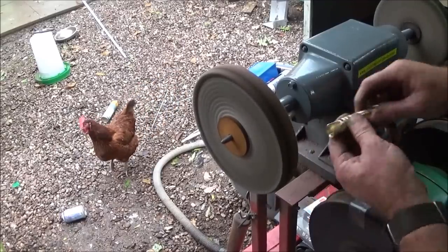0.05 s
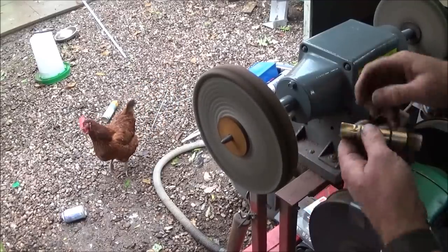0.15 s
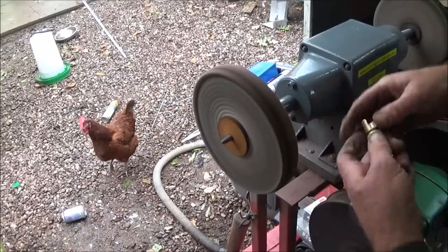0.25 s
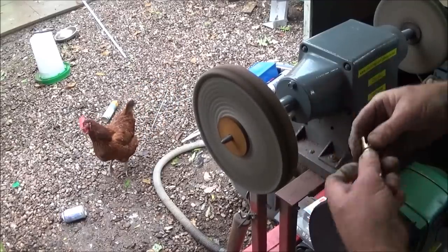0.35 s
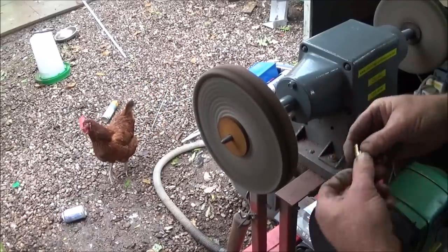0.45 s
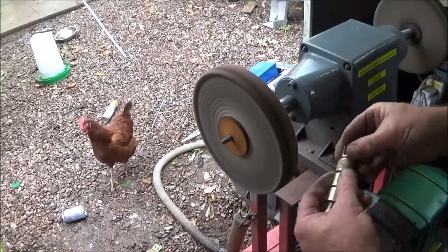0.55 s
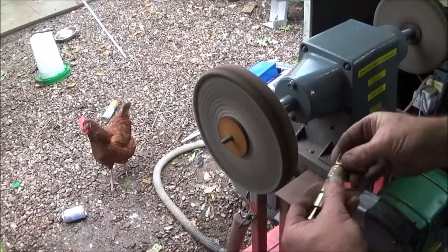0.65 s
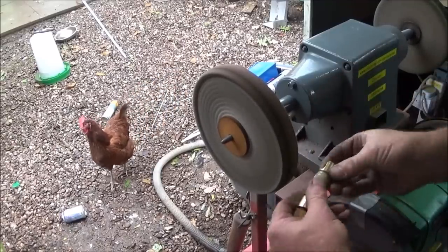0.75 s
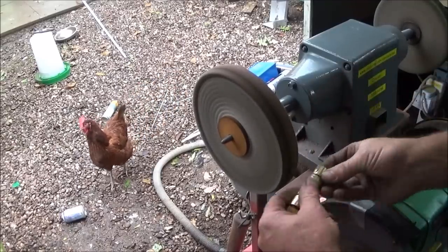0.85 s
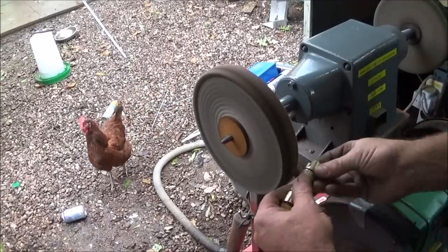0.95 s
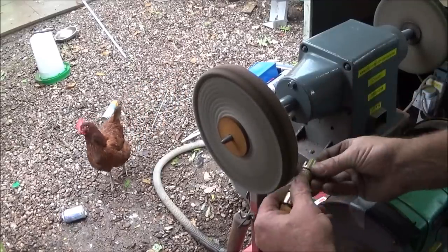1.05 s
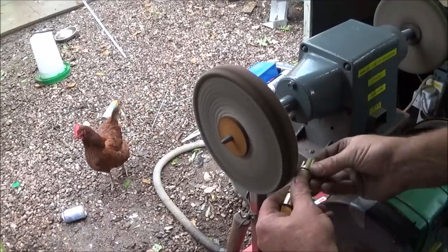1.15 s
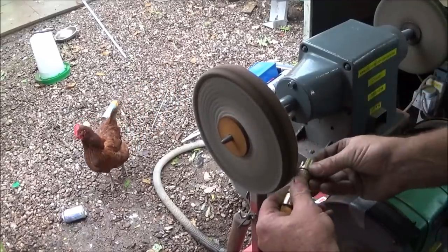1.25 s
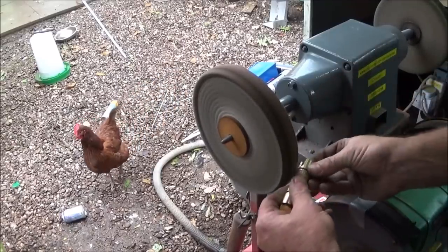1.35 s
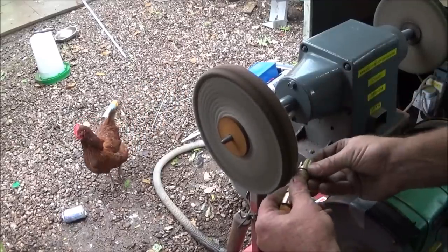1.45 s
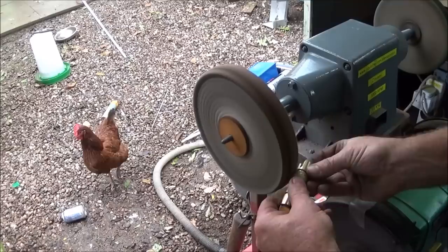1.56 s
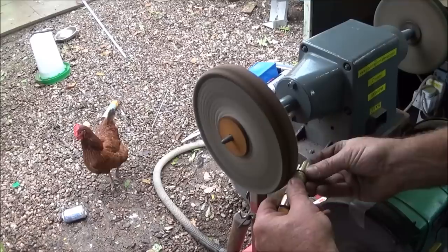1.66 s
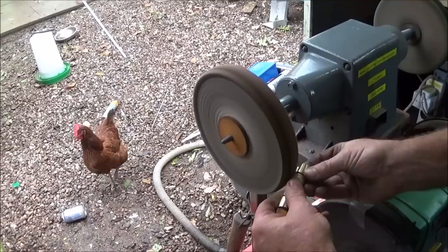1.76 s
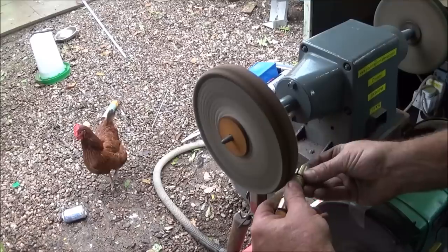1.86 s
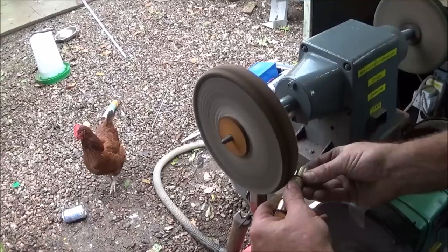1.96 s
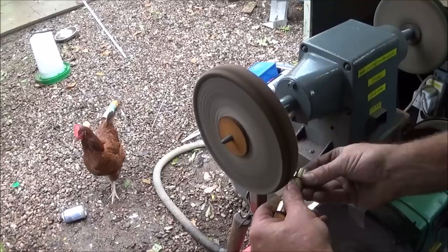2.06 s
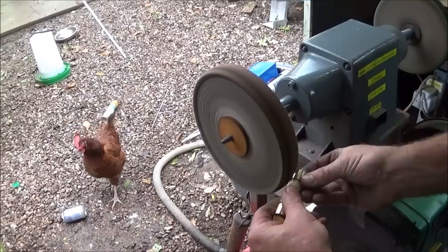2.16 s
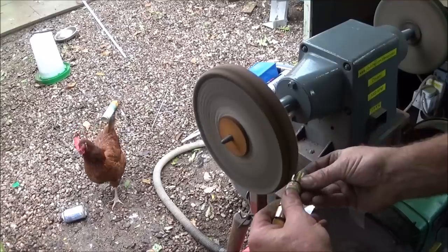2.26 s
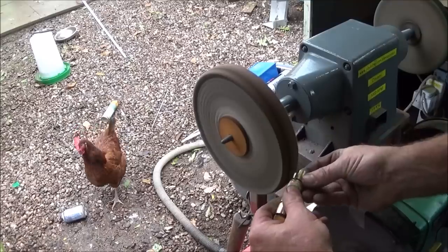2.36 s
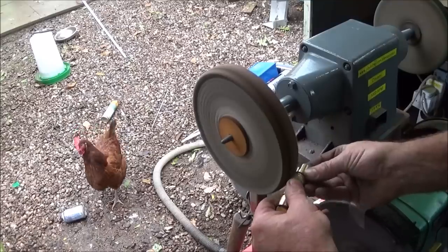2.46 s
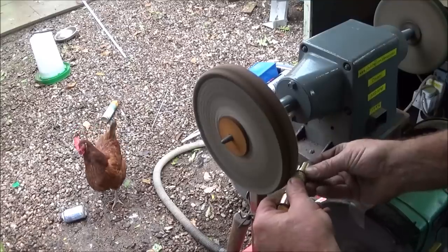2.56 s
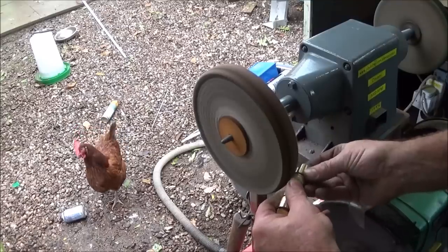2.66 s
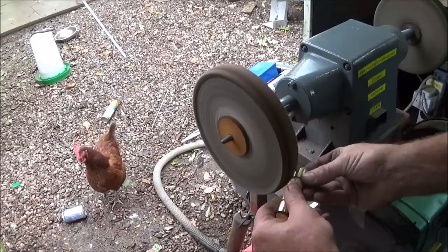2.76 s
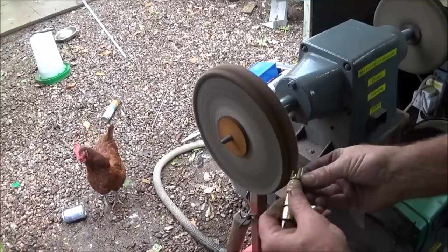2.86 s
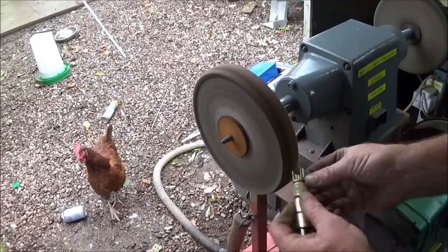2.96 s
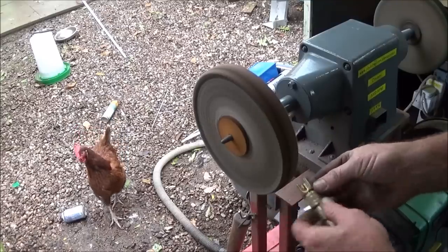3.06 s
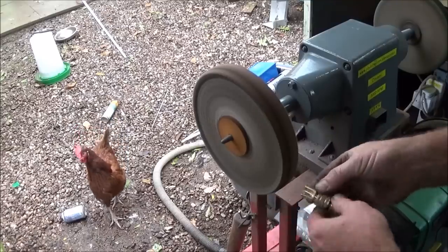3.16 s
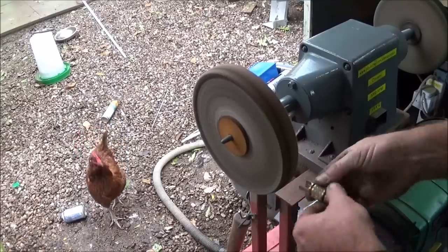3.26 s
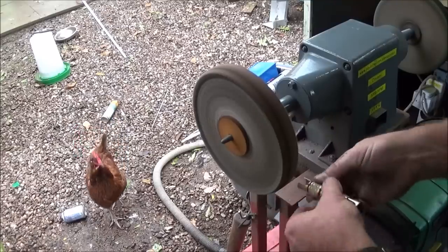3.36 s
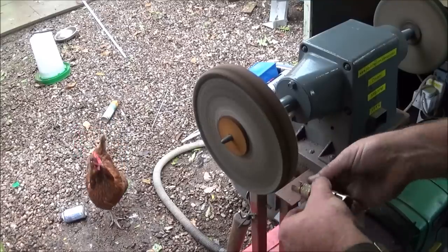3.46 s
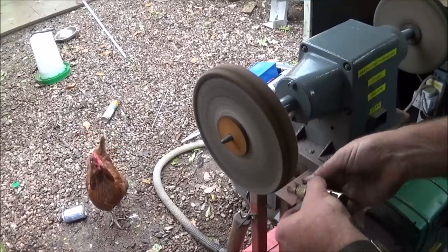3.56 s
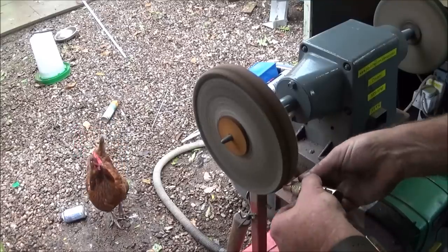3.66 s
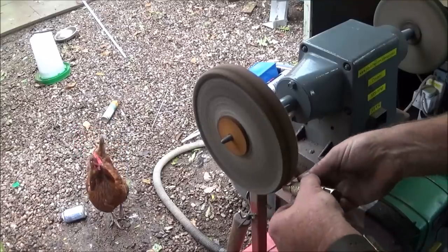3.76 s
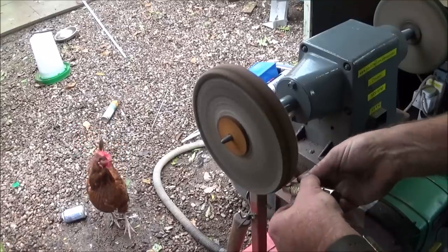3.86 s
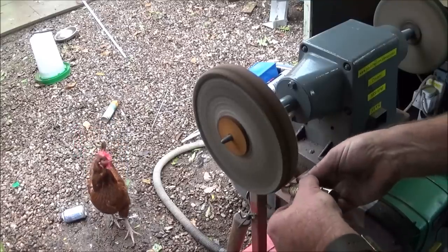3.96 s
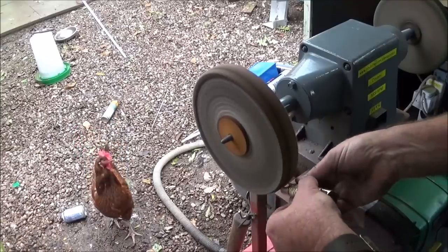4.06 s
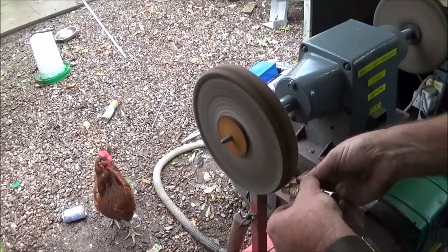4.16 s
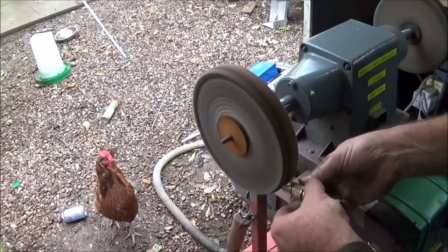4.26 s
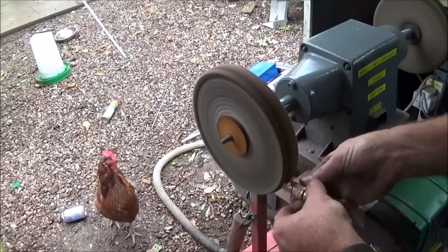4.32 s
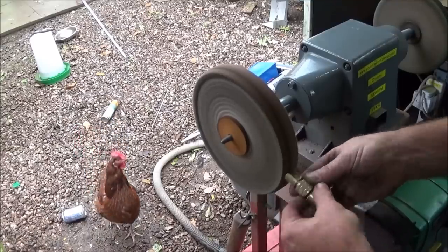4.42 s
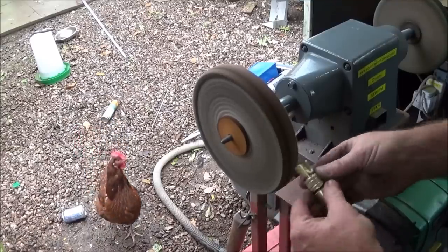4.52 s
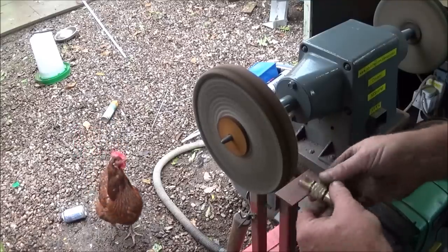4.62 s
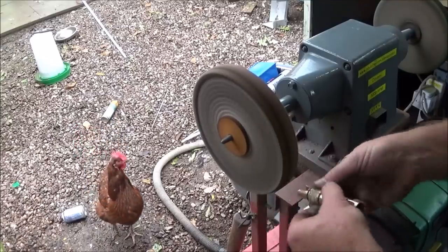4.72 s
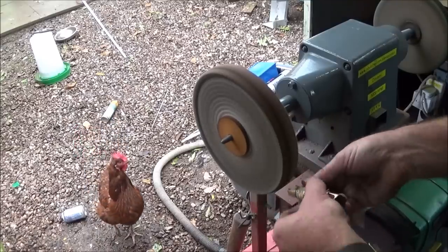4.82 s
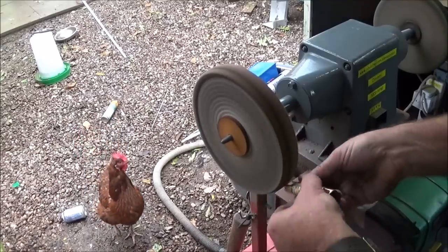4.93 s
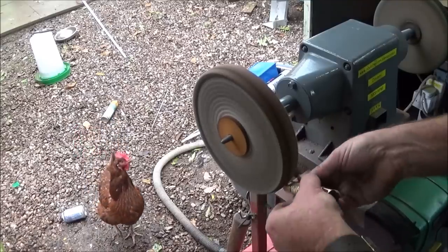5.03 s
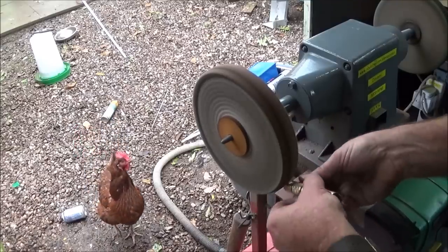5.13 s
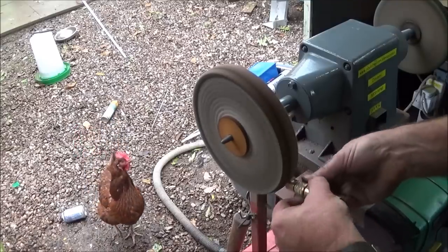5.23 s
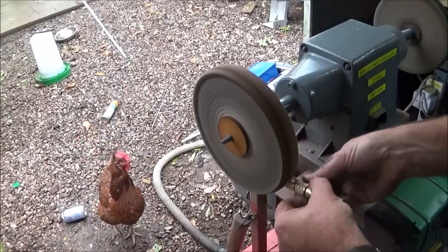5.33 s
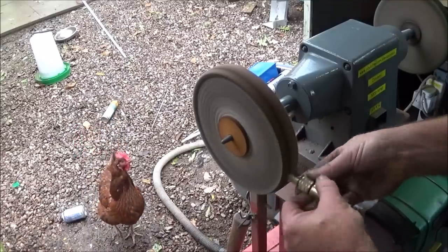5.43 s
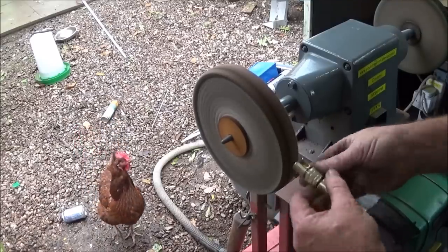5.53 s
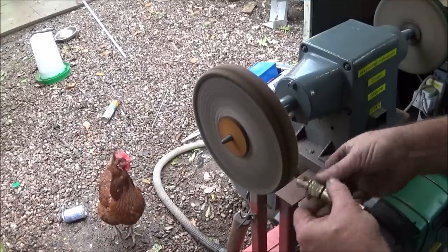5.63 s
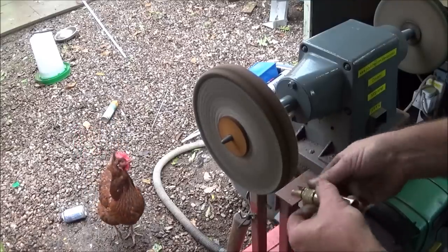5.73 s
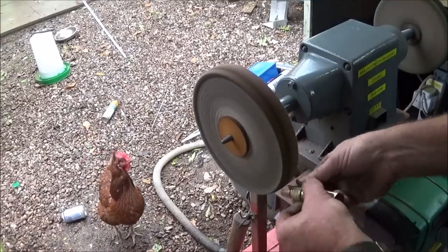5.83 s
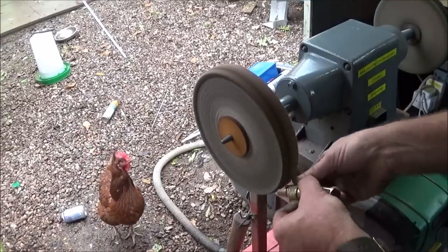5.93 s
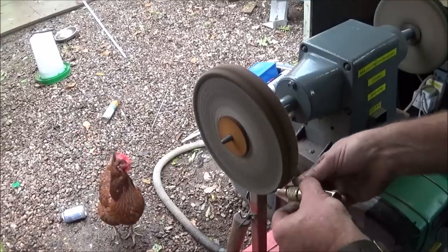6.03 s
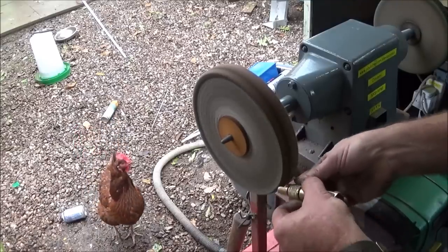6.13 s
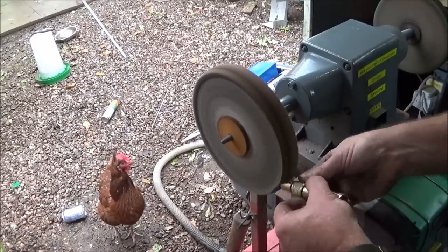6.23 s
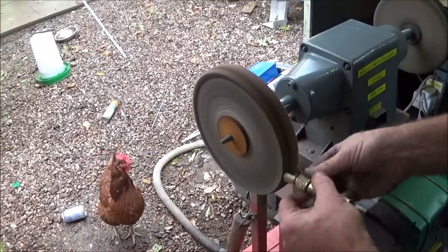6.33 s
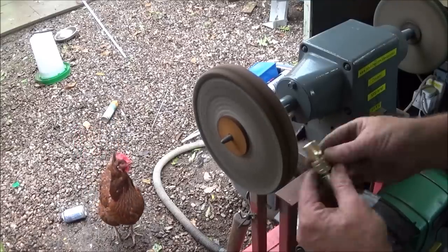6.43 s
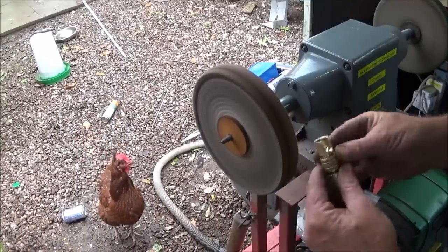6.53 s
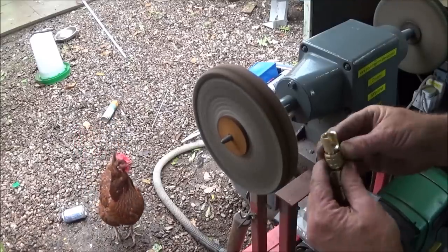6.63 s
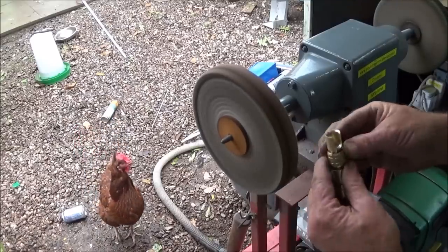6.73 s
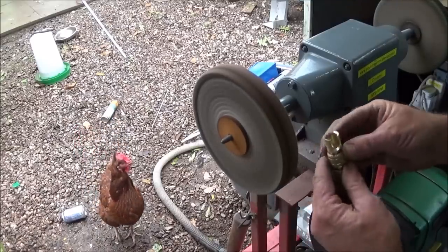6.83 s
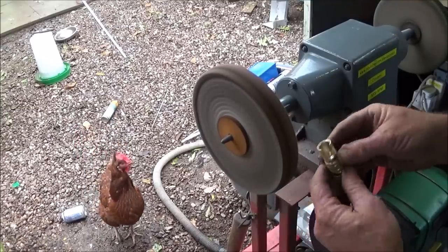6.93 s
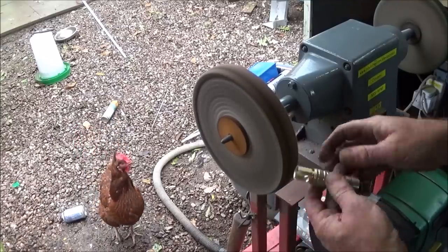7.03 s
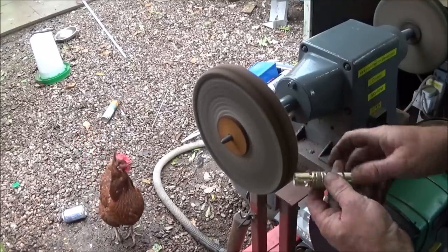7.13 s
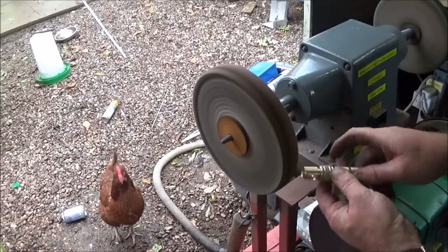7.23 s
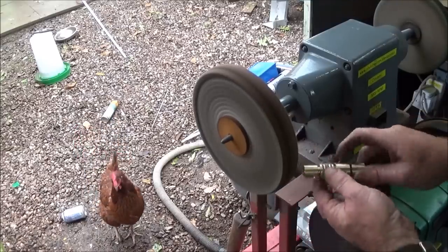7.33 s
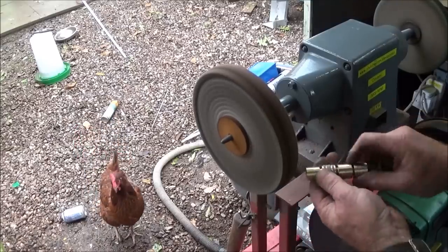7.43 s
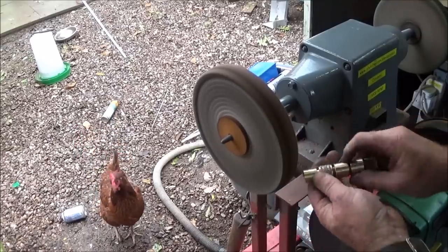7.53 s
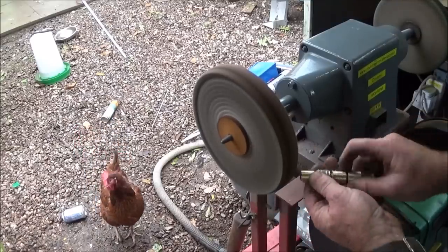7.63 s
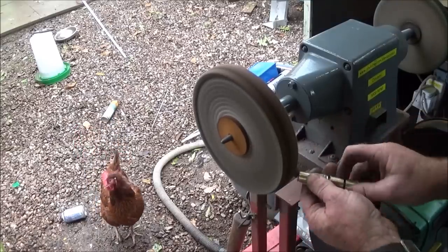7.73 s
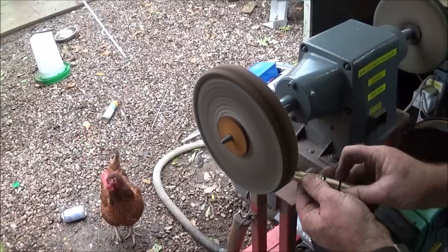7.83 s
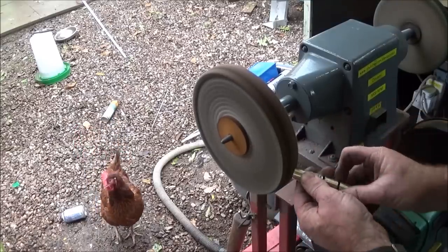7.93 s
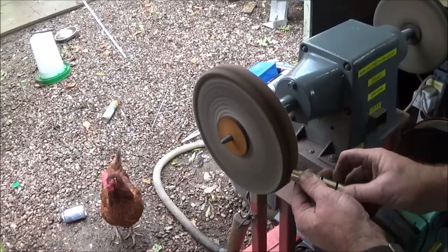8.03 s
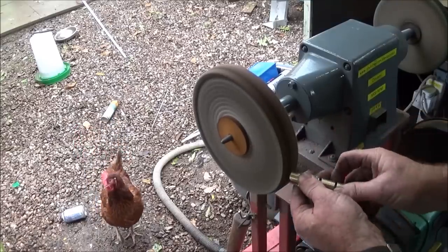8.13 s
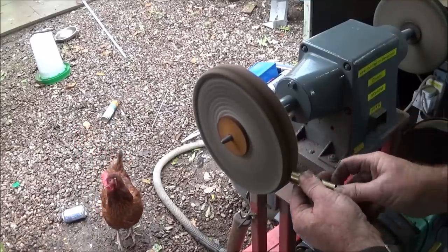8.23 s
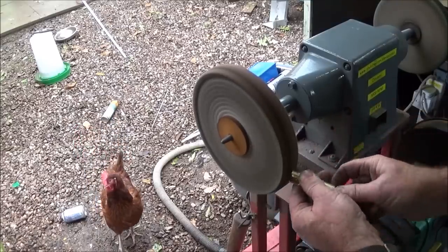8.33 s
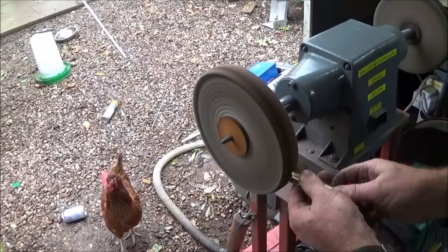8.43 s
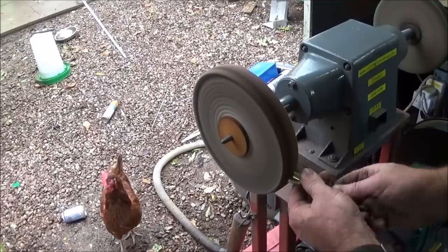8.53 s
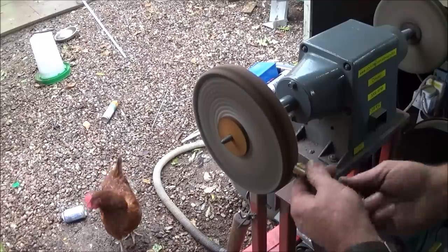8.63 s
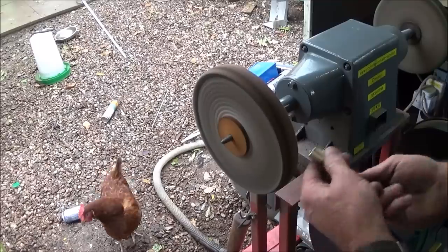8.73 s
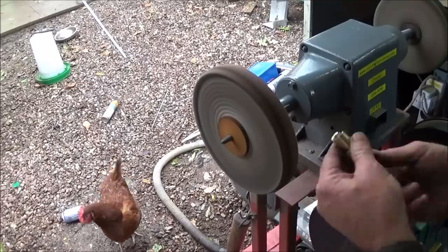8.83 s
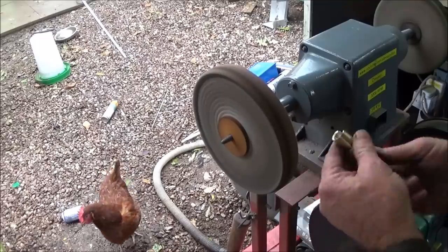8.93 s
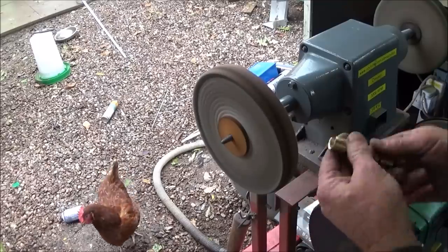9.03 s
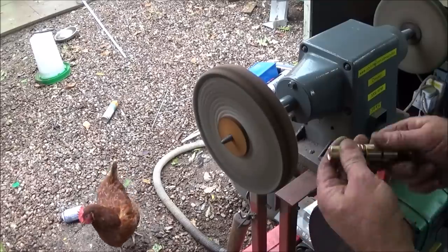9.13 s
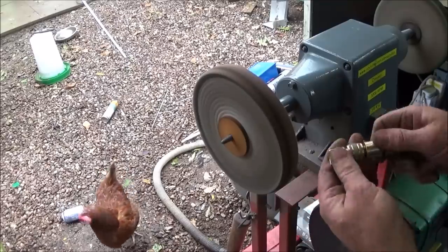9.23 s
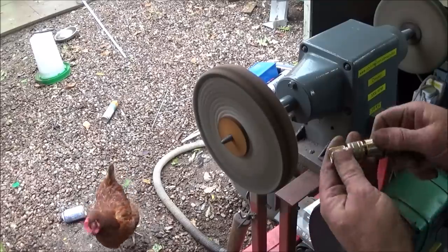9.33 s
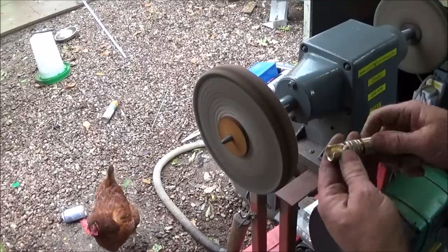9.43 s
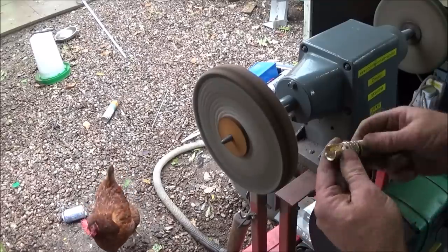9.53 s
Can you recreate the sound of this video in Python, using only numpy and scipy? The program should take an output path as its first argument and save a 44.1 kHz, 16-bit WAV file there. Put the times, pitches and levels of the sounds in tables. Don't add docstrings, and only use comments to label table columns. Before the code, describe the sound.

Steady whirring motor and rushing air in an open outdoor shed, heard close up in stereo. Brass rubs against spinning cloth in six separate strokes: two early, three firmer ones in the middle, then, after a pause, one slow last approach. Each scrape is sizzling and high, with shifting metallic tones. The background sinks during rubs and swells back afterwards. A very short, rising hen croon closes.

```python
import sys
import numpy as np
from scipy import signal
from scipy.fft import rfft, irfft, next_fast_len
from scipy.io import wavfile
from scipy.ndimage import uniform_filter1d

SR = 44100
rng = np.random.default_rng(int(sys.argv[2]) if len(sys.argv) > 2 else 0)


def gain_from_db(level_db):
    decades = np.asarray(level_db, float) / 20
    return 10 ** decades


def wav_record(signal):
    frames = np.transpose(np.atleast_2d(signal))
    bounded = np.clip(frames, -1, 1)
    quanta = np.round(bounded * 32767).astype(np.int16)
    wavfile.write(sys.argv[1], SR, quanta)


N = 422478
TIME = np.arange(N) / SR

FREE_HZ = 49.85
AIR_DB, HUM_DB, BUZZ_DB, SHAKE_DB = -31.5, -29, -35, -47.5
HUM_DB_PER_HZ, BUZZ_DB_PER_HZ, SHAKE_DB_PER_HZ = 13, 8, 7
# shaft_order, level_db
HUM_ORDERS = [(3, -8.5), (4, -26)]
# shaft_order, level_db
BUZZ_ORDERS = [(5, 6), (6, 8), (7, 10.5), (8, 7)]
# shaft_order, level_db
ROTOR_ORDERS = [(9, -4), (10, -1), (11, -3), (12, 5), (13, -3), (15, -6), (16, -38), (17, -1.5), (18, -5),
                (19, -4.5), (21, 5), (22, -15.5), (23, -21), (25, -28), (28, -18)]
# shaft_order, level_db
SHAKE_ORDERS = [(1, 0), (2, 0)]
# pitch_hz, level_db
BEARING_LINES = [(2506.0, -11), (3880.0, -7), (4126.0, -5), (4164.0, -9), (4226.0, -14), (4310.0, -11),
                 (4372.0, -7), (4617.0, -7), (4656.0, -12), (4863.0, -2), (4894.0, -12), (4901.0, -5),
                 (4955.0, -14), (4963.0, -12), (4998.0, -14), (5097.0, -9), (5139.0, -14), (5147.0, -13),
                 (5159.0, -8), (5197.0, -8), (5354.0, -11), (5404.0, -13), (5588.0, -11), (5794.0, -14),
                 (5955.0, -13), (5974.0, -12), (5993.0, -13), (6080.0, -11)]
# frequency_hz, density_db (per Hz)
AIR_SPECTRUM = [(30, -40), (95, -27), (200, -24), (380, -14.5), (775, -18.5), (1030, -15.5), (1240, -17.5),
                (3190, -18.5), (4990, -16.5), (6650, -19.5), (10700, -22), (14600, -42.5), (16500, -31.5)]
# time_s, hum_db, buzz_db
SHADE = [(0, 0, 3), (.55, -1, 2), (1, -4, 0), (1.25, -4.5, -5), (1.6, -1.5, 2), (2.1, 0.5, -1),
         (2.35, -1.5, 5.5), (2.9, -4, -3.5), (3.3, -1, 2), (3.7, -1, 1.5), (4.6, -1, 1), (6.2, 0.5, 1),
         (7, -1, 0.5), (7.7, -0.5, 3.5), (8.3, -2.5, -2.5), (8.8, 0.5, 1.5), (9.2, 0, 2), (9.58, -1, 4.5)]

SLIP_LAG_S, STAND_LAG_S, EASE_S = 0.0867, 0.036, 0.04596
TOUCH_S, LIFT_S, CLEAR_DB = 0.042, 0.046, -36.5
# time_s, hiss_db, ring_db (main ring over the hiss)
STROKES = [
    [(1.3, -39, -14), (1.6, -26, -9), (1.65, -21.5, -14), (1.85, -14, -3), (1.92, -16.5, 0.5),
     (2.05, -14.5, 3.5), (2.2, -15.5, 5), (2.26, -23, -2)],
    [(2.425, -19, 5.5), (2.49, -14.5, -8), (2.63, -21.5, -24), (2.7, -15, 0), (2.77, -11.5, 6),
     (2.855, -12.5, 3)],
    [(3.72, -25, 13), (3.81, -20, 7), (3.934, -22.5, 9.5), (4.17, -20, 4), (4.35, -18, 14), (4.43, -11, -5),
     (4.475, -13, -15)],
    [(4.986, -20.5, 2), (5.08, -20.5, 1.5), (5.22, -19, 9), (5.36, -19.5, 9), (5.46, -14, 1),
     (5.496, -18, -5)],
    [(5.912, -21, 2), (6.12, -17, -6.5), (6.256, -15, 5), (6.35, -9.5, -2.5), (6.384, -17, -5)],
    [(7.85, -37, -11), (8.012, -35, -18), (8.05, -22, -15), (8.15, -17, -10), (8.46, -12, -20),
     (8.57, -14, -4), (8.63, -17.5, -13)],
]
# end_slip_hz, rise_exponent
LEANS = [
    (.27, 1.8),
    (0.301, 2.205),
    (.85, 2.6),
    (1.05, 1.3),
    (1.05, 1.3),
    (0.248, 0.304),
]

SHIFT_S = .06
UPPER_FOLLOW = 0.55
# frequency_hz, density_db (per Hz)
CLOTH_SPECTRUM = [(2500, -27.5), (3500, -8.5), (4760, -1.5), (6000, -3), (7800, -7.5), (9600, -4.5),
                  (12000, -20.5), (15800, -46)]
# frequency_hz, density_db (per Hz)
RASP_SPECTRUM = [(900, -32), (1400, -8), (2000, -5), (2700, 0), (3300, 0.5), (4000, -14)]
# frequency_hz, density_db (per Hz)
SHEEN_SPECTRUM = [(8000, -43), (10000, 6), (12000, -2), (13300, 0), (15000, -26)]
# frequency_hz, width_hz, level_db
BODY_RINGS = [(8815, 40, 0), (8935, 50, -3), (9090, 60, -13)]
# frequency_hz, width_hz, level_db
UPPER_RINGS = [(10720, 51, -4), (10650, 45, 5)]
# frequency_hz, width_hz, level_db
TIP_RINGS = [(13070, 30, -7), (14480, 60, -4), (14577, 12, 0)]
# start_s, throb_db, modes_db, sheen_db, tip_db (the last three over the hiss)
GRIPS = [(1.3, 1.5, -12, -14, -31), (1.91, 2.4, -5, -10.5, -21), (2.35, 2, -11, -17, -25),
         (3.6, 3, -1, -3.5, -11), (3.98, -1, -0.5, -1.5, -19), (4.36, 1.5, -2, -13, -17),
         (4.9, -0.2, -4, -12, -32), (5.19, -1.5, 0, -9, -21), (5.41, 1.5, -1.5, -14, -26),
         (5.8, 1.6, -4.5, -16, -21.5), (6.21, 2.5, -1.5, -16, -20), (7.8, 2, -9.5, -19, -32),
         (8.52, 3, -21, -26, -17)]
# rasp_db, upper_rings_db (over the hiss)
EDGES = [(-7, -21), (-8.5, -7), (-8.5, -11), (-5, -17), (-2.5, -10), (-21, -8), (-4.5, -10.5), (-3, -17),
         (-7.5, -14), (-7, -14), (-5.5, -8.5), (-12, -12), (-10.5, -2)]
# frequency_hz, width_hz, level_db
EARLY_GRIP_MODES = [
    [(3130, 150, 2), (4640, 360, 0), (6140, 220, -5)],
    [(3200, 40, -15), (4360, 75, 3), (4740, 230, -1), (6500, 40, 0)],
    [(4480, 60, 3), (5250, 60, -10), (5740, 60, -11), (8200, 55, 12)],
    [(4860, 60, 10), (5120, 66, 8), (5920, 50, 7), (4100, 26, 8)],
    [(3070, 49, -11), (4100, 46, 4), (4450, 220, 4), (5130, 160, 6)],
    [(3460, 400, 5), (4540, 300, -2), (5700, 400, -1)],
]
# frequency_hz, width_hz, level_db
LATE_GRIP_MODES = [
    [(2630, 28, -5), (3460, 36, 0), (4160, 71, 2), (4860, 50, -3), (6300, 63, -6)],
    [(1680, 50, -11), (3560, 44, -10), (4100, 64, -3), (4800, 30, -4), (5950, 70, -3), (6600, 33, -1)],
    [(3560, 540, 2), (4200, 200, -3), (5760, 200, -7)],
    [(2632, 12, -7), (3540, 39, -11), (4200, 28, -8), (4720, 38, -11), (4870, 32, -11), (6000, 56, -13)],
    [(3430, 81, 3), (4040, 21, 9), (4530, 160, 0), (5800, 119, -9)],
    [(3040, 36, -1), (5040, 60, -15), (5700, 68, 3), (7540, 150, -7.5), (8300, 160, -3)],
    [(5200, 60, -3), (5460, 60, -4)],
]

# time_s, pitch_hz, level_db
HEN = [
    (9.46, 480, -40),
    (9.485, 495, -27),
    (9.52, 525, -27),
    (9.535, 525, -32),
    (9.555, 535, -24),
    (9.58, 542, -23),
]
# frequency_hz, level_db
SPREAD = [(300, -21), (700, -8.5), (1290, -9), (2380, -10), (4400, -12.5), (9500, -14.5), (15000, -31)]

START_DB, CREEP_DB_PER_S, SINK_PER_S = -0.78, 5.4, 4.23
KNEE_DB, SQUEEZE = -14, 0.87
SENSE_S, GRAB_S, LET_GO_S = .03, .014, .025
# frequency_hz, weight_db
SENSE_WEIGHT = [(5000, 0), (9000, -4)]


def unit(x):
    return x / np.sqrt(np.mean(x ** 2))


def columns(table):
    time_s, *rest = np.transpose(table)
    return [np.interp(TIME, time_s, column) for column in rest]


def colour(x, points):
    size = next_fast_len(N)
    hz, db = np.transpose(points)
    axis = np.log(np.arange(1, size // 2 + 2) * SR / size)
    gain = gain_from_db(np.interp(axis, np.log(hz), db))
    return irfft(rfft(x, size) * gain, size)[:N]


def resonate(x, modes):
    total = 0
    for hz, width, db in modes:
        total = total + gain_from_db(db) * signal.lfilter(*signal.iirpeak(hz, hz / width, SR), x)
    return unit(total)


def walk(rate, spread_db):
    knots = gain_from_db(spread_db * rng.standard_normal(int(rate * N / SR) + 2))
    return np.interp(TIME * rate, np.arange(len(knots)), knots)


def lag(x, seconds):
    step = 1 / (seconds * SR)
    return signal.lfilter([step], [1, step - 1], x)


def load():
    drag = np.zeros(N)
    for stroke, (end_hz, curve) in zip(STROKES, LEANS):
        touch_s, lift_s = stroke[0][0], stroke[-1][0]
        along = (TIME - touch_s) / (lift_s - EASE_S - touch_s)
        drag += end_hz * np.clip(along, 0, 1) ** curve * (along < 1)
    return drag


def lines(turns, orders, wander_db, rate, scatter):
    total = 0
    for order, db in orders:
        tone = np.cos(2 * np.pi * (order * turns + scatter * rng.random()))
        total = total + gain_from_db(db) * walk(rate, wander_db) * tone
    return unit(total)


def motor(turns, slip_hz):
    hum_shade_db, buzz_shade_db = columns(SHADE)
    balls = np.cos(2 * np.pi * 4.928 * turns)
    air = unit(colour(rng.standard_normal(N) * gain_from_db(balls) * walk(12, 0.34), AIR_SPECTRUM))
    bearing_orders = [(hz / FREE_HZ, db) for hz, db in BEARING_LINES]
    whine = gain_from_db(1.0) * lines(turns, bearing_orders, 1.5, 8., 1)
    rotor = gain_from_db(-4.0) * lines(turns, ROTOR_ORDERS, 2.9, 12., 0.91)
    shake = gain_from_db(SHAKE_DB - SHAKE_DB_PER_HZ * slip_hz) * lines(turns, SHAKE_ORDERS, 1.2, 6., 1.0)
    hum_db = HUM_DB + hum_shade_db - HUM_DB_PER_HZ * slip_hz
    hum = gain_from_db(hum_db) * lines(turns, HUM_ORDERS, 1.0, 5.4, 1.0)
    buzz_db = BUZZ_DB + buzz_shade_db - BUZZ_DB_PER_HZ * slip_hz
    buzz = gain_from_db(buzz_db) * lines(turns, BUZZ_ORDERS, 2.0, 9., 0.16)
    return gain_from_db(AIR_DB) * (gain_from_db(6.5) * air + rotor + whine) + shake + hum + buzz


def rim(turns, memory, size=768):
    rough = signal.lfilter([1], [1, -memory], rng.standard_normal((512, size)), axis=0).ravel()
    fine = 4 * size * 512
    return unit(np.interp(turns * fine / 512, np.arange(fine), signal.resample(rough, fine)))


def contact():
    rows = []
    for stroke in STROKES:
        touch_s, touch_db, touch_ring = stroke[0]
        lift_s, lift_db, lift_ring = stroke[-1]
        rows += [(touch_s - 2 * TOUCH_S, -80, touch_ring), (touch_s - TOUCH_S, touch_db + CLEAR_DB, touch_ring)]
        rows += stroke
        rows += [(lift_s + LIFT_S, lift_db + CLEAR_DB, lift_ring), (lift_s + 2 * LIFT_S, -80, lift_ring)]
    return columns(rows)


def over(db, under_db):
    return np.sqrt(np.maximum(gain_from_db(db) ** 2 - gain_from_db(under_db) ** 2, 0))


def brass(seams, threads):
    out, sheen = np.zeros(N), unit(colour(threads, SHEEN_SPECTRUM))
    slide = int(SHIFT_S * SR)
    edges = [int(grip[0] * SR) for grip in GRIPS] + [N - slide]
    for grip, modes, a, b in zip(GRIPS, EARLY_GRIP_MODES + LATE_GRIP_MODES, edges, edges[1:]):
        _, _, modes_db, sheen_db, _ = grip
        span = np.arange(a - slide, b + slide)
        from_edge = np.minimum(span - span[0], span[-1] - span)
        hold = np.sqrt(np.clip(from_edge / (2 * slide), 0, 1))
        damped = [(hz, 1.3 * width, db) for hz, width, db in modes]
        body = resonate(seams[span], damped)
        out[span] += hold * (gain_from_db(modes_db) * body + gain_from_db(sheen_db) * sheen[span])
    return out


def buffing(turns):
    hiss_db, ring_db = contact()
    starts, throb_db, _, _, tip_db = np.transpose(GRIPS)
    grip = np.searchsorted(starts[1:], TIME)
    rasp_db, upper_db = uniform_filter1d(np.transpose(EDGES)[:, grip], size=2000)
    lumps = gain_from_db(throb_db[grip] * rim(turns, 0.68, size=12)) * walk(6, 0.35)
    threads = lumps ** 0.98 * (rim(turns, 0.7) + 0.51 * rng.standard_normal(N))
    seams = lumps ** 1.12 * (rim(turns, 0.93) + 0.25 * rng.standard_normal(N))
    hiss = unit(colour(1.15 * unit(threads) + 0.41 * unit(seams), CLOTH_SPECTRUM))
    rasp = gain_from_db(rasp_db) * unit(colour(seams, RASP_SPECTRUM))
    main_ring = resonate(threads, BODY_RINGS) * over(ring_db, -10.5)
    upper_ring = resonate(threads, UPPER_RINGS) * gain_from_db(upper_db + UPPER_FOLLOW * ring_db)
    rub = gain_from_db(hiss_db) * (hiss + brass(seams, threads) + rasp + main_ring + upper_ring)
    scrape = threads * gain_from_db(hiss_db + tip_db[grip])
    tip = gain_from_db(0.5) * resonate(scrape, TIP_RINGS) * np.std(scrape)
    return colour(tip + rub, [(14800, -0.5), (15500, -6)])


def hen():
    hz, db = columns(HEN)
    phase = 2 * np.pi * np.cumsum(hz) / SR
    start = np.clip((TIME - HEN[0][0]) / 0.018, 0, 1)
    return start * gain_from_db(db - 4.0) * (np.sin(phase) + .15 * np.sin(2 * phase))


def scene():
    drag = load()
    turns = np.cumsum(FREE_HZ - lag(drag, SLIP_LAG_S)) / SR
    machine = motor(turns, lag(drag, STAND_LAG_S)) + hen()
    rub = buffing(turns)
    echo = rng.standard_normal(8192) * np.exp(-np.arange(8192) / (.035 * SR))
    far_rub = colour(rub, [(3300, -3), (4600, 1), (6300, -3), (7600, -4), (8800, -2.5)])
    scattered = signal.fftconvolve(machine + far_rub, echo / np.linalg.norm(echo))[:N]
    bass = colour(machine, [(40, -26), (110, -15), (160, -13), (350, -15), (500, -30)])
    early = np.roll(bass, -int(.0009 * SR))
    side = colour(scattered, [(90, -16), (150, -34), *SPREAD]) + early
    return machine + rub + np.array([side, -side])


def camera_gain(dry, size=64):
    sensed = colour(np.mean(dry, axis=0), SENSE_WEIGHT)
    power = uniform_filter1d(sensed ** 2, int(SENSE_S * SR))[::size]
    dt, slow, cut, gain = size / SR, START_DB, 0, []
    for level_db in 10 * np.log10(power + 1e-12):
        want = SQUEEZE * max(level_db + slow - KNEE_DB, 0)
        reaction_s = GRAB_S if want > cut else LET_GO_S
        cut += (want - cut) * min(dt / reaction_s, 1)
        slow += (CREEP_DB_PER_S - SINK_PER_S * cut) * dt
        gain.append(slow - cut)
    return np.interp(np.arange(N), size * np.arange(len(gain)), gain)


def roll_off(x):
    return signal.sosfilt(signal.butter(12, 15760, fs=SR, output="sos"), x)


def record(dry):
    hiss = gain_from_db(-48.0) * unit(colour(rng.standard_normal(N), [(6000, -20), (13000, 0)]))
    loud = dry * gain_from_db(camera_gain(dry)) + hiss
    soft = loud / (1 + (loud / .8) ** 4) ** .25
    return roll_off(soft)


dry = scene()
out = record(dry)
wav_record(out)
```